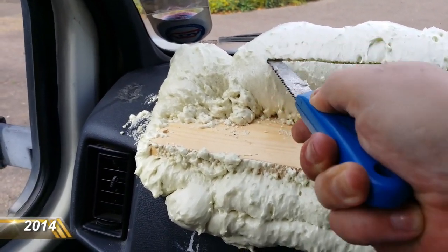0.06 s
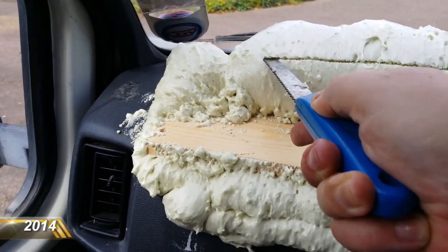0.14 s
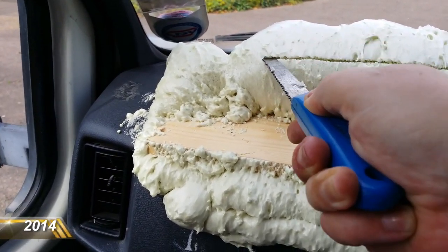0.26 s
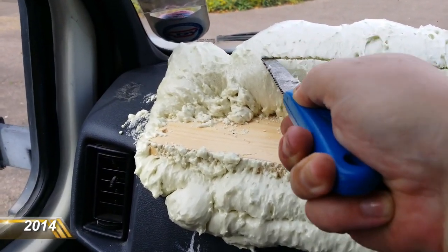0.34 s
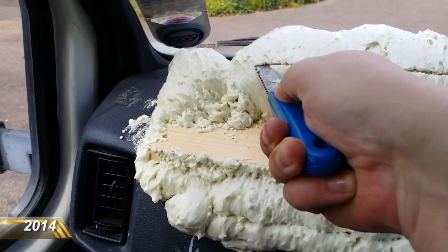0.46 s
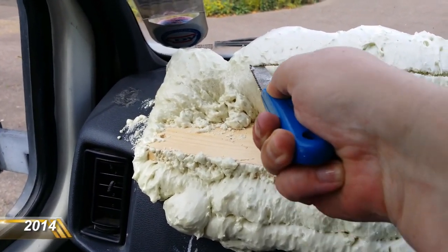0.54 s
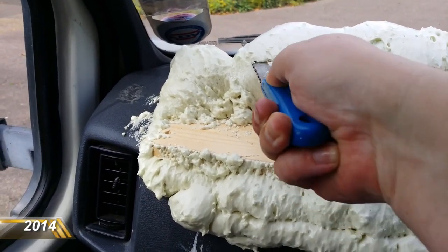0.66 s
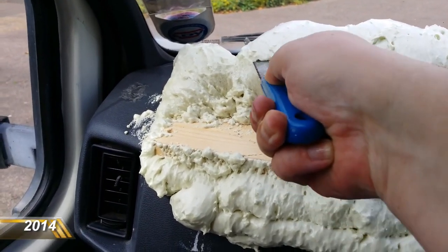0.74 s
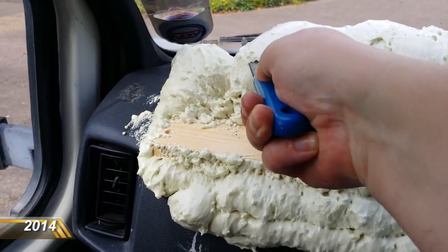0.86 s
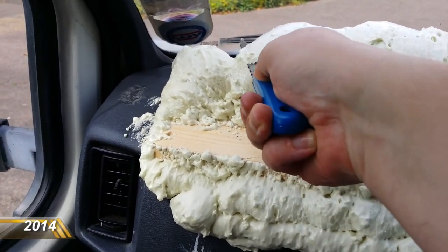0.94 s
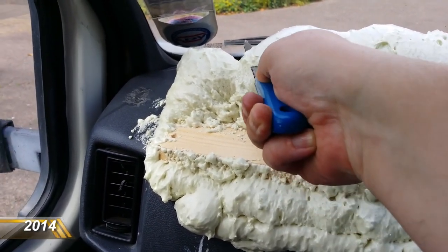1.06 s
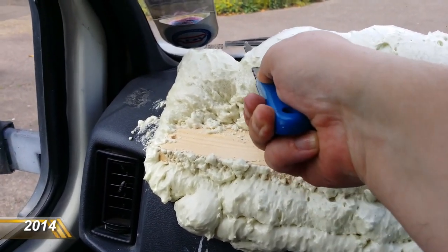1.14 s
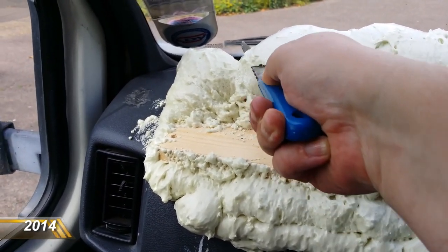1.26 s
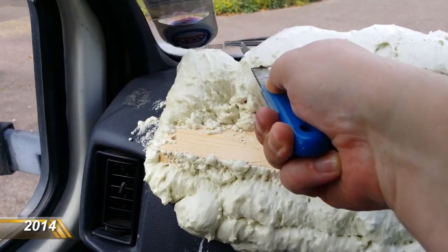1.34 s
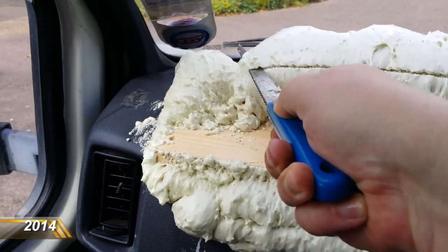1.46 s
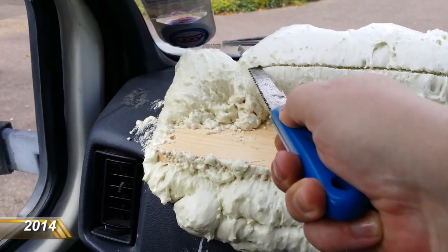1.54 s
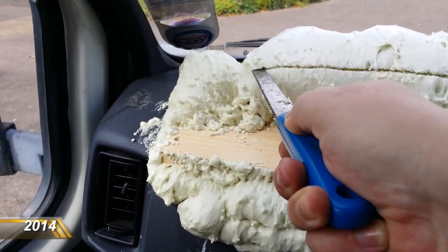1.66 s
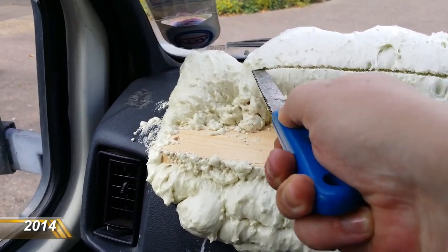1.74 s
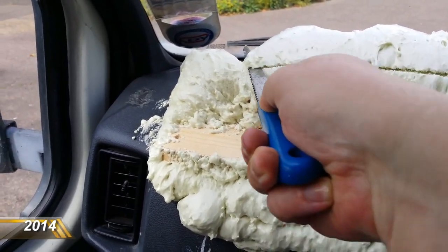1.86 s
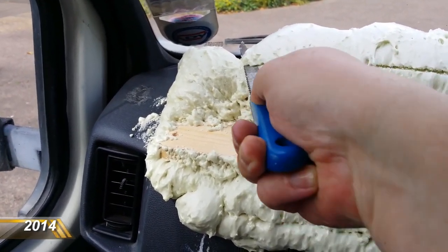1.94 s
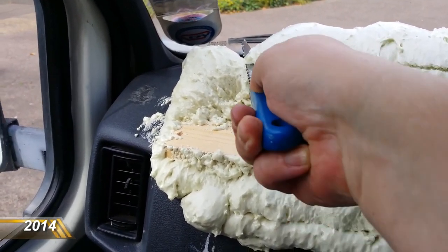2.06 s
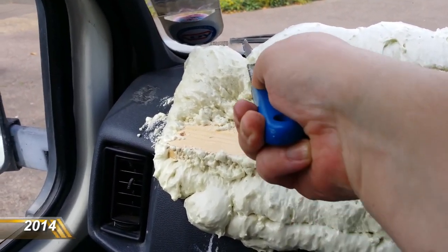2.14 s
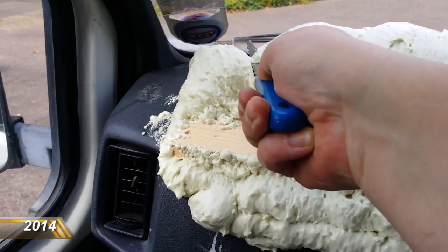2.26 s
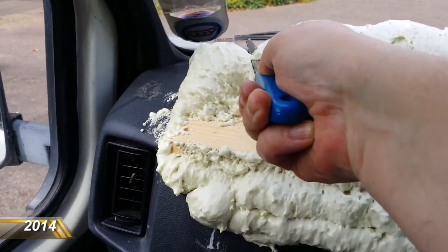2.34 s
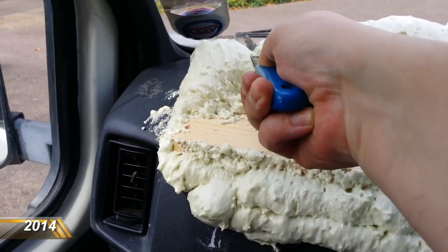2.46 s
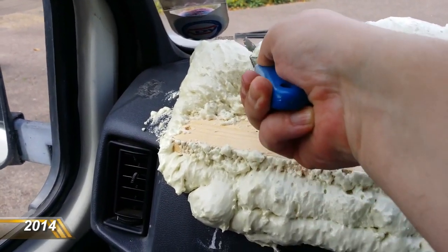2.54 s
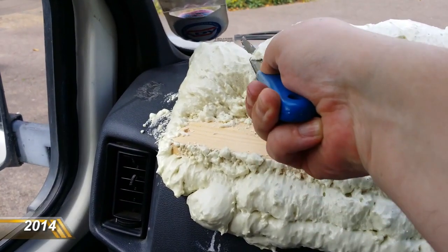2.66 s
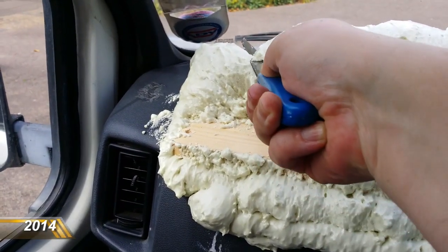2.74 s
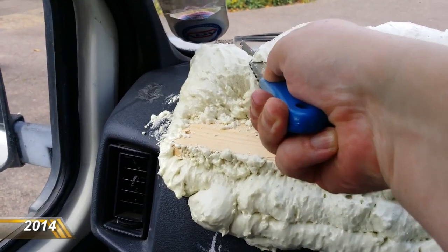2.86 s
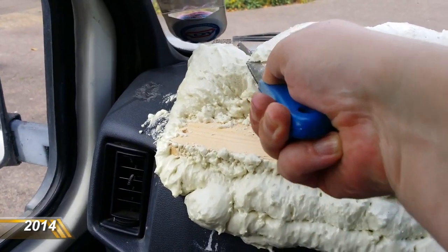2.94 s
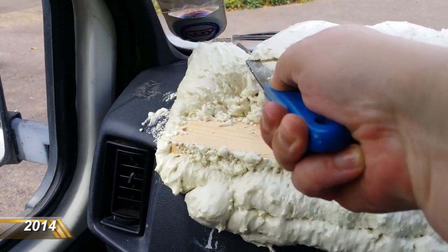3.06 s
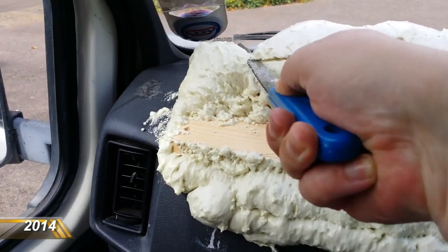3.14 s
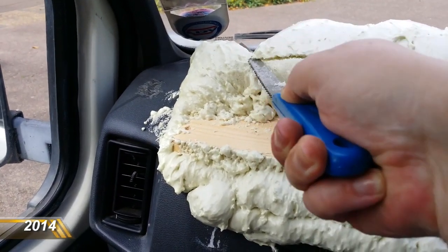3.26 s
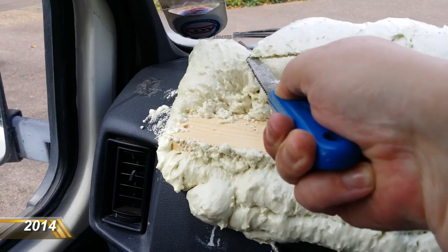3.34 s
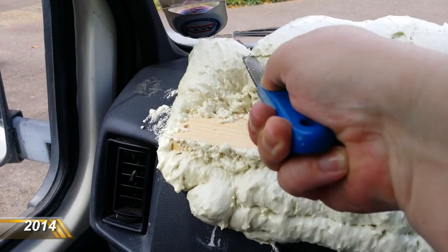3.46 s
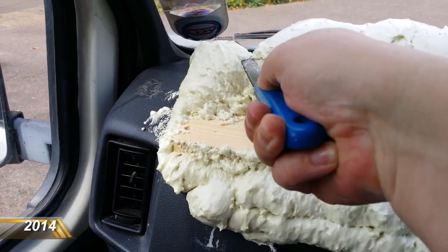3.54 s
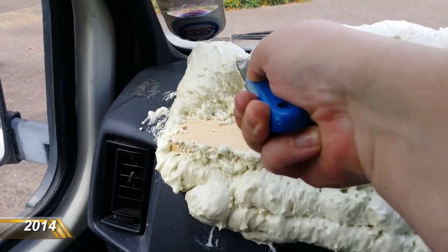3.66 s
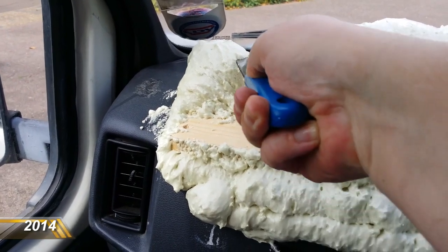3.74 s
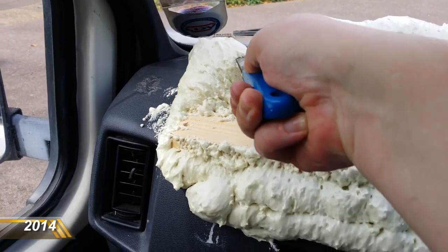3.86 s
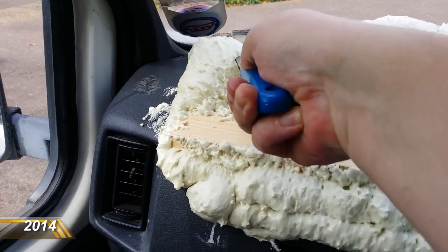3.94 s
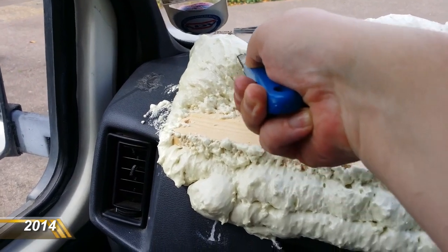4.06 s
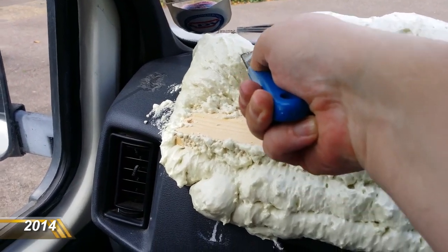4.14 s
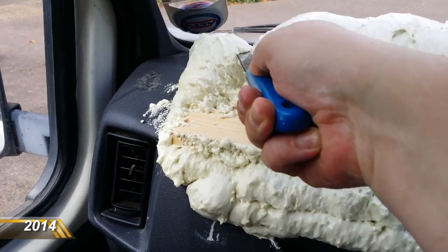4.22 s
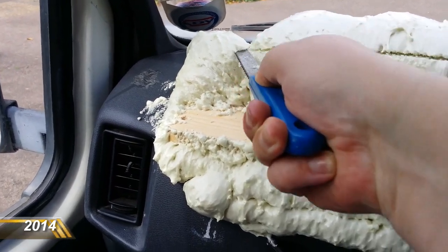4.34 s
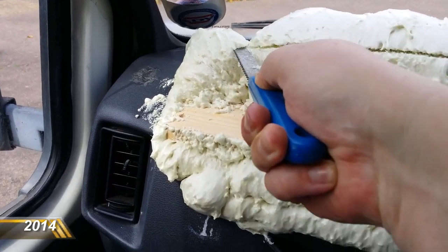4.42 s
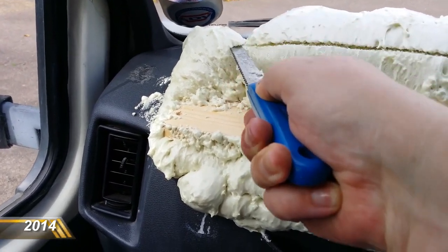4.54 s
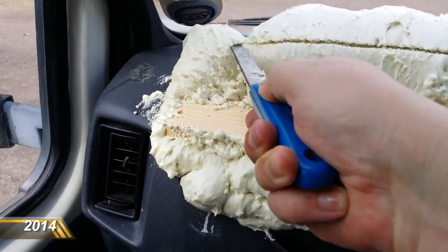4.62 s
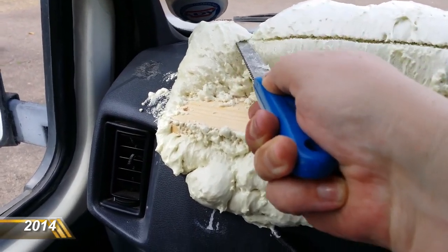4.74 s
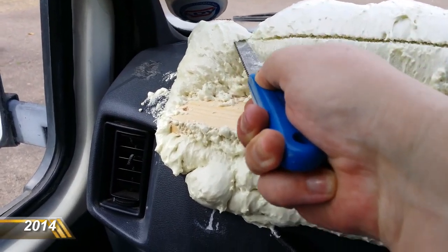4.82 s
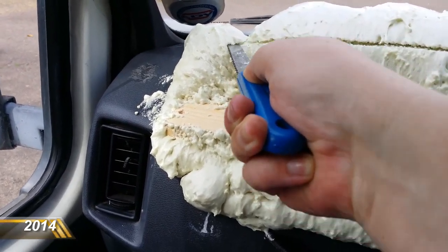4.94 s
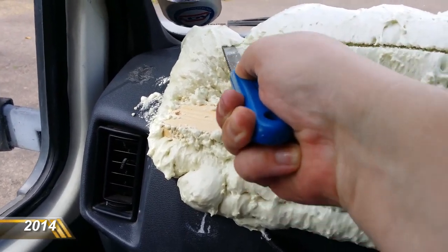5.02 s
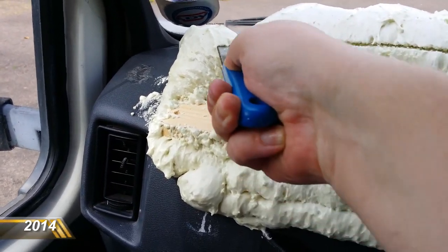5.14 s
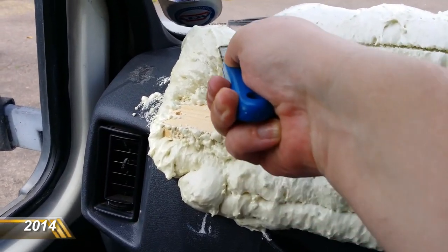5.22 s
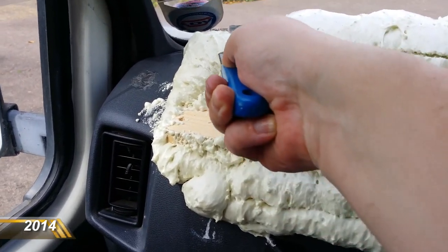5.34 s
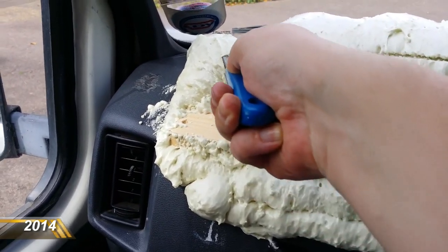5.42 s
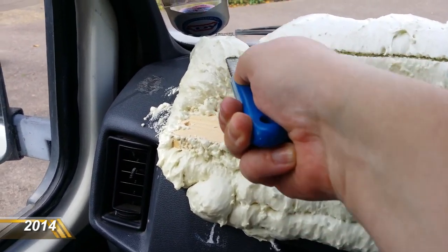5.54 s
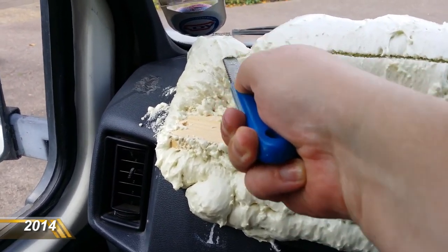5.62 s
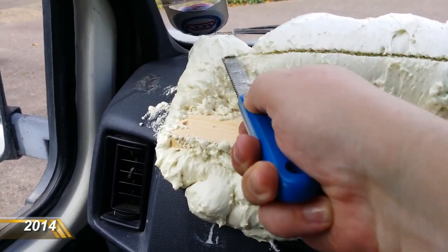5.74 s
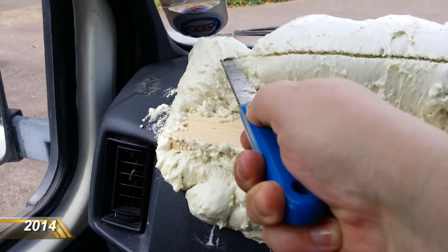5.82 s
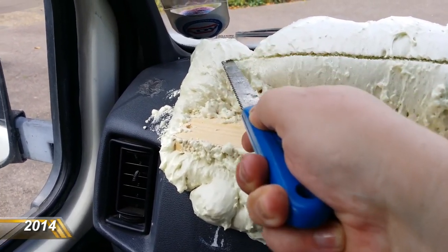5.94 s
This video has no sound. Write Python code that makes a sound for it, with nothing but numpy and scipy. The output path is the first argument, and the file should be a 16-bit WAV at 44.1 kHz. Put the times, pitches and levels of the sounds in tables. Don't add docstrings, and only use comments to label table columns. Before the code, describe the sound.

Very close stereo sound of a small toothed blade sawing hardened foam on a vehicle dashboard. Nine gritty, bright rasping strokes run back and forth, slightly uneven in length, with tiny gaps at each turn. Foam crackles and lumps snap off, the panel resonates hollowly, and the blade catches now and then. The small padded cab is nearly dry; soft low thumps, faint rumble and hiss lie underneath.

```python
import sys
import numpy as np
from scipy import signal
from scipy.fft import rfft, irfft, next_fast_len
from scipy.io import wavfile

SR = 44100
rng = np.random.default_rng(int(sys.argv[2]) if len(sys.argv) > 2 else 0)


def wav_record(signal):
    frames = np.transpose(np.atleast_2d(signal))
    bounded = np.clip(frames, -1, 1)
    quanta = np.round(bounded * 32767).astype(np.int16)
    wavfile.write(sys.argv[1], SR, quanta)


def attenuation_scalar(level_db):
    decades = np.asarray(level_db, float) / 20
    return 10 ** decades


N = 263718


def saw():
    # turn in seconds, rest in s, cutting in s, speed-up in s, slow-down in s.
    strokes = [
        (0.0, -.2, .44, 0.052, .035),
        (0.265, 0.021, .803, .065, .1),
        (1.179, .066, .458, 0.088, 0.086),
        (1.721, .024, .826, .065, .085),
        (2.61, .032, .672, 0.043, 0.038),
        (3.346, 0.034, 0.671, 0.073, 0.041),
        (4.074, 0.03, .618, 0.066, 0.031),
        (4.763, .033, .635, .07, 0.033),
        (5.461, .03, .488, .085, .035),
    ]
    echo_db = -9.5
    out = np.zeros((2, N + SR))
    cells, lumps = bursting_cells(), [snaps(0), snaps(1)]
    ends_s = [row[0] for row in strokes[1:]] + [N / SR]
    for k, (row, end_s) in enumerate(zip(strokes, ends_s)):
        pull = k % 2
        a, sound = stroke(row, end_s, pull, cells, lumps)
        out[:, a:a + sound.shape[1]] += sound + attenuation_scalar(echo_db) * cab(sound)
    return out[:, :N]


def stroke(row, end_s, pull, cells, lumps):
    # low edge in Hz, high edge in Hz.
    bands_hz = [(1300, 6500), (400, 1300), (6500, 14500), (80, 400)]
    lump_reach = [0.34, 0.15, 0.43, 0.028]
    # frequency in Hz, width in Hz, left minus right in dB.
    rings = [(100.5, 14.6, 23.5), (197, 16, 0), (277.5, 17, -1), (427, 39, 2.5), (579.4, 26.5, 12),
             (734, 18, 13.5), (911, 66, 0), (1160, 34, -3), (1453, 204, -1), (1806, 200, 0.5),
             (2248, 108, -3), (3080, 51, -13), (4530, 1700, 1.5), (8680, 1070, -2.5)]
    ring_depth_db = [(7, 3, 5.4, 3.5), (5.3, 9.9, 9.6, 6.5), (4.5, 2.5, 4, 12.6), (2.5, 12, 6.8, 7),
                     (20.5, 2.7, 2.5, 8.6), (6.6, 14.7, 9.4, 12.5), (13.5, 17.1, 9.9, 7.3), (3, 5, 9, -4),
                     (2.3, .3, 4, 9), (1, 5.5, 5, 1), (3.1, 11.2, 2.8, 8.7), (0.82, 0.76, 2.2, 4.3),
                     (4.9, 2.7, 1.1, 5.4), (1.4, 1.1, 3.5, 3.3)]
    ring_pull_db = (0.56, 2, -1, -1.1, -0.46, 0.49, -0.56, 3, 0.26, -1, -1, -0.13, .5, -0.44)
    # frequency in Hz, level in dB per Hz.
    tear_colour = [(60, -19), (150, -7), (330, -13.5), (500, -17), (800, -16.5), (1300, -6.5), (2500, 1),
                   (5000, -0.5), (7000, -2), (11500, -3.5), (14400, -1.5), (15200, -45)]
    # frequency in Hz, left minus right in dB.
    lean = [(60, -18.5), (210, -1.5), (400, -8), (800, -9), (1300, 6), (1900, 7.5), (3500, 5), (6000, 1),
            (9000, -5), (12000, -1.5), (15000, 5.5)]
    # frequency in Hz, width in Hz, level in dB.
    dips = [(372, 180, -3), (487, 60, -3), (788, 36, -4), (1004, 39, -3), (1278, 65, -6.5),
            (3740, 1000, -1.5)]
    depth_s = (.1, 1.6, 3.2, 5.7)
    lean_db = (.1, .1, 0.5, 0.5)

    turn_s, rest_s, cutting_s, rise_s, fall_s = row
    a, b = round(turn_s * SR), round(end_s * SR)

    def deep(values):
        return np.interp((turn_s + end_s) / 2, depth_s, values)

    size = 2 * next_fast_len((b - a) // 2 + 2048)
    t, hz = np.arange(a, b) / SR, np.fft.rfftfreq(size, 1 / SR)
    side = np.array([[.5], [-.5]])

    ring_power = 0
    for (f, width, pan_db), depths_db, pull_db in zip(rings, ring_depth_db, ring_pull_db):
        ring_db = deep(depths_db) + pull * pull_db + side * pan_db
        ring_power = ring_power + attenuation_scalar(2 * ring_db) / (1 + (2 * (hz - f) / width) ** 2)
    dips_db = sum(db / (1 + (2 * (hz - f) / width) ** 2) for f, width, db in dips)
    colour_db = read(tear_colour, hz) + dips_db + side * (read(lean, hz) + deep(lean_db))
    body = attenuation_scalar(colour_db) * np.sqrt(1 + ring_power)
    ringing = causal(body.mean(0)) * body / body.mean(0)

    edges = [1 / (1 + (hz / f) ** 10) for f in (55, 400, 1300, 6500)]
    shares = [edges[3] - edges[2], edges[2] - edges[1], 1 - edges[3], edges[1] - edges[0]]
    levels_db = band_levels(t, turn_s + rest_s, cutting_s, rise_s, fall_s, deep, pull)
    drive = 0
    for k, ((lo, hi), share, level_db) in enumerate(zip(bands_hz, shares, levels_db)):
        inside = (hz > lo) & (hz < hi)
        loudness = np.sqrt((body[:, inside] ** 2).mean(0).sum() / len(hz))
        snap = lumps[k == 2][:, a:b]
        force = cells[:, a:b] * attenuation_scalar(level_db + 1.0) + snap * lump_reach[k]
        drive = drive + rfft(force, size) * share / loudness
    return a, irfft(port_pair(*drive, hz) * ringing, size)


def band_levels(t, start_s, cutting_s, rise_s, fall_s, deep, pull):
    # time in seconds, tearing level in dB.
    pressure = [(0.0, -16.5), (.2, -20.5), (.44, -16.5), (.76, -27), (.95, -23.5), (1.47, -18.5),
                (1.86, -20.5), (2.44, -21.5), (3.2, -23.5), (3.5, -17), (3.8, -19), (4.0, -22),
                (4.28, -19.5), (4.67, -21.5), (4.97, -17), (5.4, -19), (5.7, -13.5), (5.98, -18)]
    # time in seconds, level in dB, half length in seconds.
    stalls = [
        (0.862, -3, 0.034),
        (2.309, -9, .045),
        (3.707, -5, 0.071),
        (2.668, -18, 0.038),
        (4.15, -14, 0.04),
        (2.22, -4.5, .08),
        (3.255, -4, .02),
        (2.38, -3, .04),
        (5.14, -2, .06),
    ]
    creep_in_s, creep_out_share = 0.0095, .19
    thud_db, thud_late_db, thud_late_s = (-4.5, -4, -5.5, -12), (-3, -2, 1, -8), 0.051
    pull_thud_db, pull_late_db, pull_late_s = -.8, (-2, -.5, -3, -9), .2
    fizz_db, fizz_per_db, fizz_sag_db, pull_fizz_db = (-1.8, -2.6, -2.8, -2.6), -.06, -1.8, 1.1
    shake_db, shake_per_db, pull_shake_db = (-15.5, -9.5, -11.5, -15.5), -0.03, -.3
    shake_late_db, shake_late_s = -8.5, 0.083

    ahead_s = t - start_s
    speed = eased(ahead_s, creep_in_s, rise_s)
    speed = speed * eased(cutting_s - ahead_s, creep_out_share * fall_s, fall_s)
    stall_db = sum(db * np.exp(-((t - s) / half_s) ** 2) for s, db, half_s in stalls)
    tear = np.interp(t, *np.transpose(pressure)) + stall_db + 20 * np.log10(speed + 1e-3)
    over_db, since_s = np.maximum(tear + 20, -20), np.maximum(ahead_s, 0)

    thud = deep(thud_db) + deep(thud_late_db) * np.exp(-since_s / thud_late_s)
    thud = thud + pull * (pull_thud_db + deep(pull_late_db) * np.exp(-since_s / pull_late_s))
    fizz = deep(fizz_db) + pull * pull_fizz_db
    fizz = fizz + fizz_per_db * over_db + fizz_sag_db * since_s / cutting_s
    shake = deep(shake_db) + pull * pull_shake_db
    shake = shake + shake_late_db * np.exp(-since_s / shake_late_s) + shake_per_db * over_db
    return tear, tear + thud, tear + fizz, tear + shake


def eased(ahead_s, creep_s, reach_s):
    return 1 - np.exp(-creep_s * np.logaddexp(0, ahead_s / creep_s) / reach_s)


def bursting_cells(per_s=12000, spread_db=1.0, bites_per_s=120, bite=0.39):
    clump_db = .9 * wobble(12, 50) + .7 * wobble(50, 250)
    bites = np.minimum(rng.exponential(1, N), 2.4) * (rng.random(N) < bites_per_s / SR)
    rush = 1 + bite * signal.oaconvolve(bites, attenuation_scalar(-60 * np.arange(800) / SR / 0.0086))[:N]
    size_db = spread_db * np.minimum(rng.exponential(1, N), 4) + clump_db
    size = attenuation_scalar(size_db) * (rng.random(N) < per_s / SR)
    return evened(size * rush * rng.choice([-1., 1.], (2, N)))


def snaps(bright):
    # time in seconds, peak in dB, brightness in dB.
    lumps = [(0.2965, -24, -6), (0.317, -11, -15), (0.9011, -12, -7), (1.1033, -20.5, -3.5),
             (1.7433, -29, -6), (1.8824, -10, -5), (1.9196, -7, -14), (2.1216, -8, -12), (2.6873, -30, -3),
             (2.6999, -23, -11), (2.7873, -7, -1), (2.8131, -11, -5), (2.843, -6, -7), (2.9914, -14, -15),
             (3.0618, -10, -6), (3.151, -15, -0.5), (3.2037, -10.5, -9), (3.2804, -10.5, -10),
             (3.389, -24, 2), (3.798, -7, -4), (3.9906, -9.5, -2), (4.455, -5.5, -14), (4.5335, -10, -12),
             (4.669, -9.5, -8), (4.788, -29.5, -2), (4.819, -19.5, -3), (5.0006, -6.5, -3.5),
             (5.494, -36, -7), (5.5243, -24, -11), (5.911, -14, -3.5)]
    out, t = np.zeros((2, N + 600)), np.arange(600) / SR
    decay = np.exp(-(t / .003) ** 2) + .35 * attenuation_scalar(-60 * t / .05)
    shape = np.minimum(t / .0008, 1) * decay
    crackles = rng.choice([-1., 1.], (len(lumps), 2, 600))
    for (s, db, bright_db), crackle in zip(lumps, crackles):
        at = round(s * SR)
        out[:, at:at + 600] += attenuation_scalar(db + 2.5 + bright * bright_db) * shape * crackle
    return out[:, :N]


def cab(x, t60_s=0.066, low_hz=900):
    at = np.arange(40, 6000, 20) + rng.integers(0, 20, (2, 298))
    taps = np.zeros((2, 6100))
    np.put_along_axis(taps, at, rng.choice([-1., 1.], at.shape) * attenuation_scalar(-60 * at / SR / t60_s), 1)
    taps = taps / np.linalg.norm(taps[0])
    taps = signal.lfilter(*signal.butter(2, low_hz, "high", fs=SR), taps)
    return signal.oaconvolve(x, taps, axes=1)[:, :x.shape[1]]


def causal(gain):
    log = np.log(np.maximum(np.concatenate([gain, gain[-2:0:-1]]), 1e-5))
    return gain * np.exp(-1j * signal.hilbert(log).imag[:len(gain)])


def port_pair(a, b, hz):
    # frequency in Hz, left-right likeness from 0 to 1.
    likeness = [(40, .96), (210, .94), (350, .62), (600, .92), (950, .92), (1400, .78), (2200, .45),
                (4500, .35), (7000, .15), (15000, 0)]
    # frequency in Hz, left's lead in radians.
    lead = [(100, .1), (700, .3), (1300, 1.5), (1900, 0), (2600, .4), (3600, -2), (4600, 0), (5400, 1),
            (15000, 0)]
    same = np.clip(read(likeness, hz), 0, 1)
    left = a * np.exp(1j * read(lead, hz))
    right = same * a + np.sqrt(1 - same ** 2) * b
    return np.array([left, right])


def read(points, hz):
    f, value = np.transpose(points)
    return np.interp(np.log(hz + 1), np.log(f + 1), value)


def evened(x):
    return x / np.sqrt(np.mean(x ** 2) + 1e-20)


def wobble(lo_hz, hi_hz):
    band = signal.butter(2, [lo_hz, hi_hz], "band", fs=SR, output="sos")
    return evened(signal.sosfilt(band, rng.standard_normal(N)))


def steady(colour):
    hz = np.fft.rfftfreq(N, 1 / SR)
    pair = port_pair(*rfft(rng.standard_normal((2, N))), hz)
    return evened(irfft(pair * attenuation_scalar(read(colour, hz)), N))


def background():
    # frequency in Hz, level in dB per Hz.
    hum = [(12, -37), (20, -25), (38, 7), (54, 13), (66, -2.5), (110, -5), (140, -42), (240, -120)]
    # frequency in Hz, level in dB per Hz.
    hiss = [(47, -34), (80, -4.5), (246, -15.5), (981, -20), (1140, -19), (1420, -21), (1960, -26),
            (5180, -25), (7480, -30), (14000, -26.5)]
    # time in seconds, level in dB, half length in seconds.
    thumps = [
        (0.9, -32, .04),
        (2.198, -29, 0.062),
        (2.5, -47, .15),
        (3.1, -54, .3),
        (2.3, -45, .1),
        (1.084, -47.5, 0.053),
        (3.96, -45, 0.044),
        (5.411, -49, 0.066),
        (5.63, -47, .04),
    ]
    rumble_db, sway_db, hiss_db = -59, 3.5, -54.2 + 3.0
    t = np.arange(N) / SR
    level = attenuation_scalar(rumble_db + sway_db * wobble(1, 11))
    level = level + sum(attenuation_scalar(db) * np.exp(-((t - s) / half_s) ** 2) for s, db, half_s in thumps)
    rumble = steady(hum) * level * attenuation_scalar(np.array([[-1.1], [1.1]]))
    return rumble + attenuation_scalar(hiss_db) * steady(hiss)


def scene():
    return attenuation_scalar(-2.5) * saw() + background()


def top_cut(x):
    return signal.sosfilt(signal.butter(12, 15740, fs=SR, output="sos"), x)


def record(dry):
    rounded = np.tanh(dry)
    low_pass = signal.firwin(1201, 14540, window=("kaiser", 7), fs=SR)
    limited = signal.oaconvolve(rounded, low_pass[None], "same")
    return top_cut(limited)


dry = scene()
out = record(dry)
wav_record(out)
```